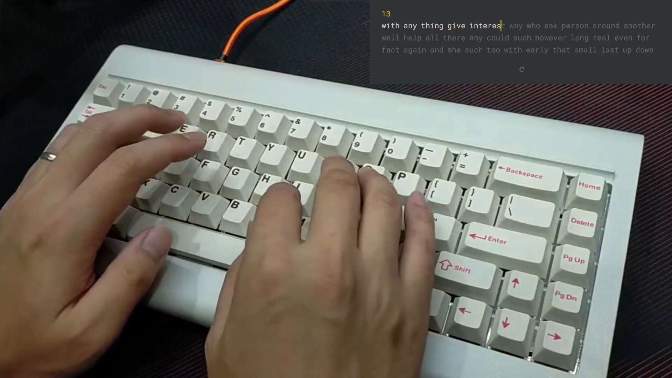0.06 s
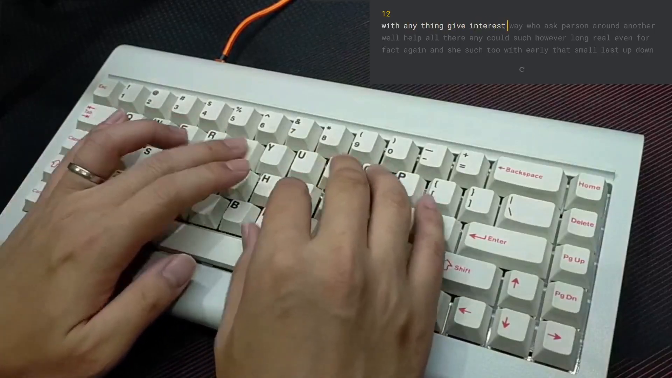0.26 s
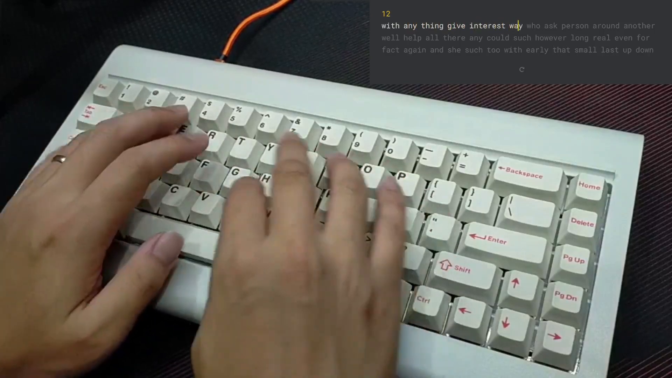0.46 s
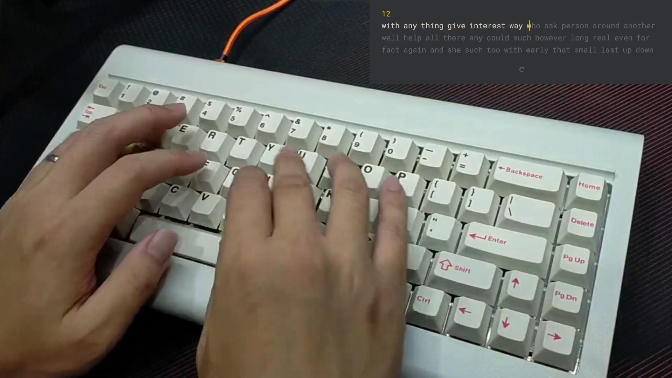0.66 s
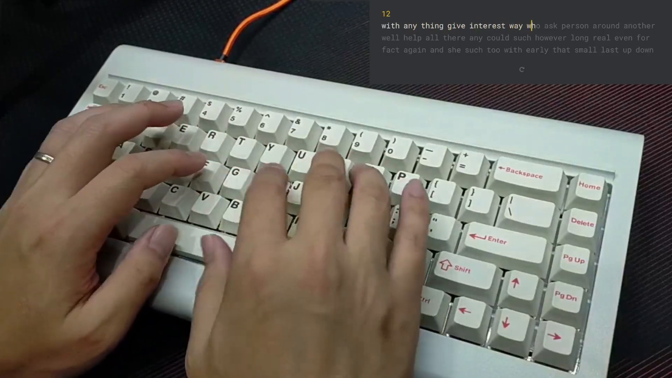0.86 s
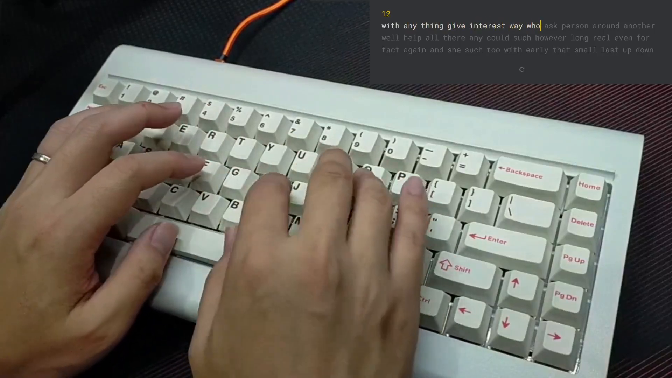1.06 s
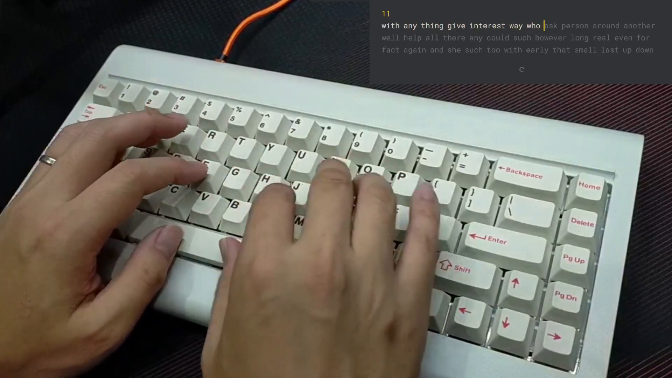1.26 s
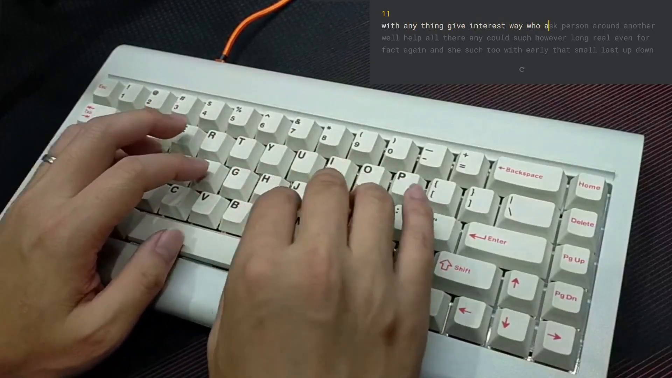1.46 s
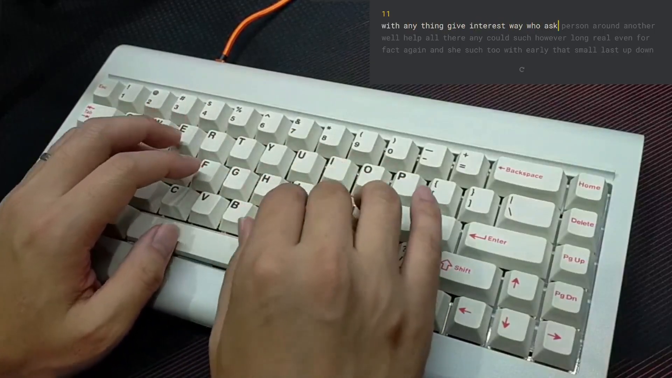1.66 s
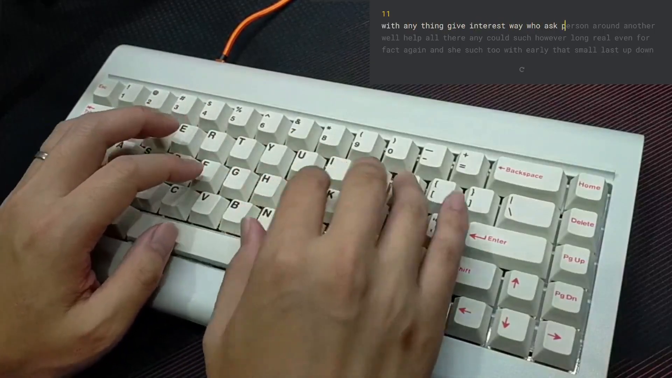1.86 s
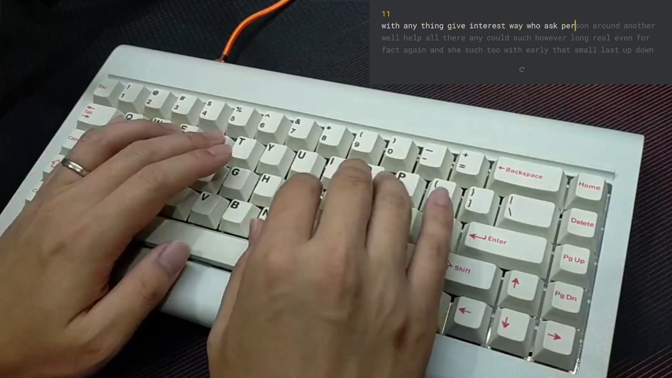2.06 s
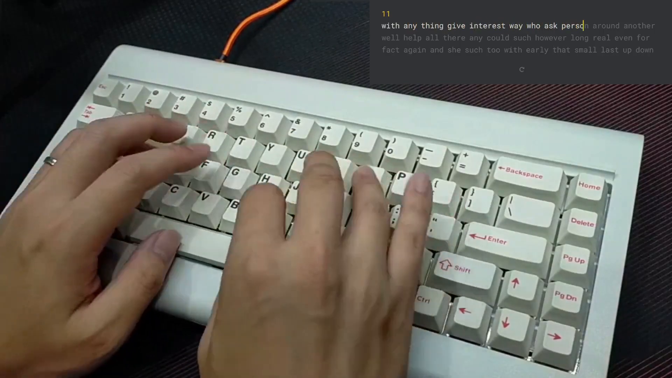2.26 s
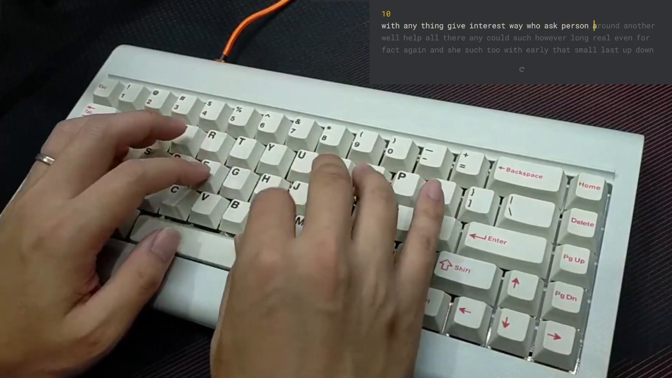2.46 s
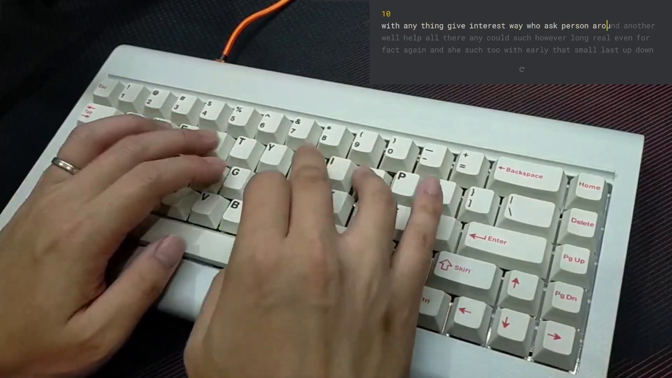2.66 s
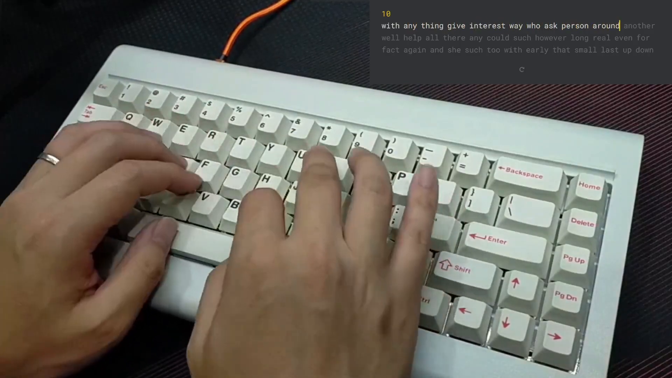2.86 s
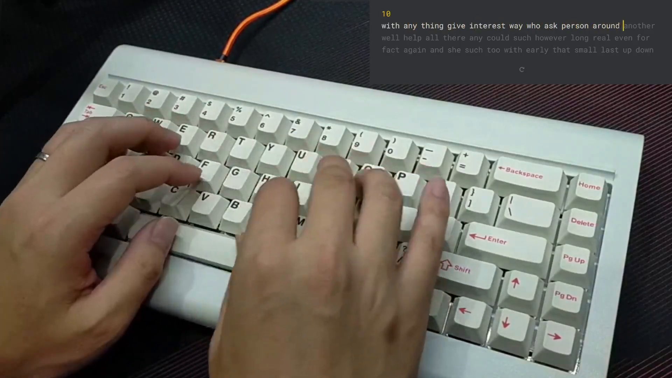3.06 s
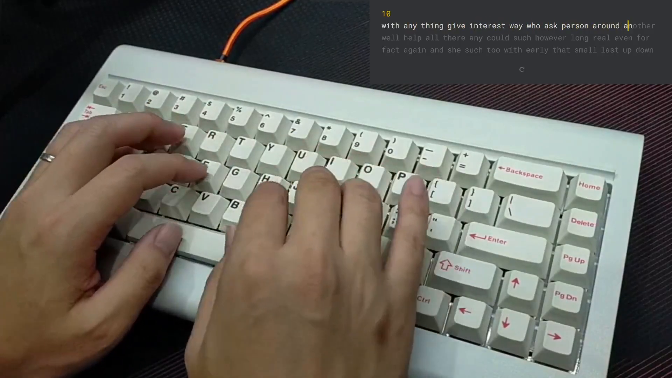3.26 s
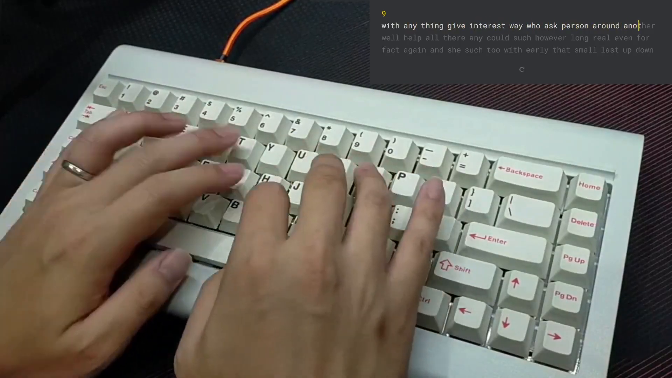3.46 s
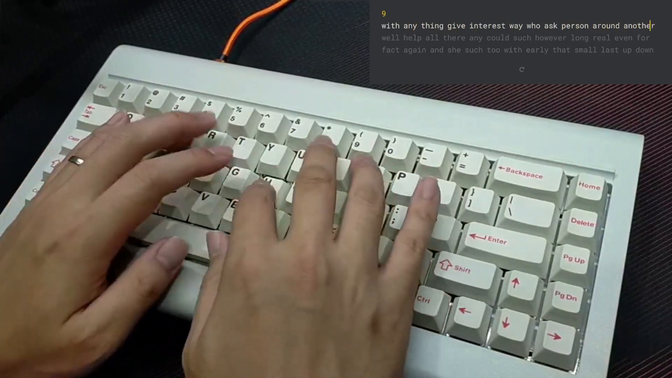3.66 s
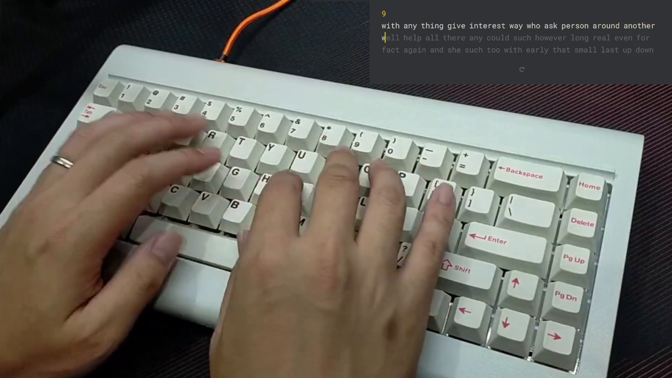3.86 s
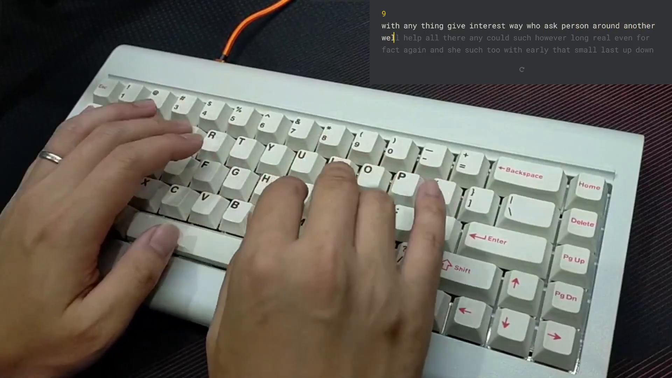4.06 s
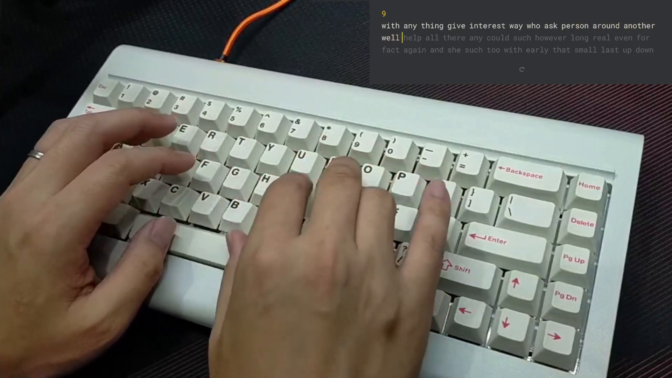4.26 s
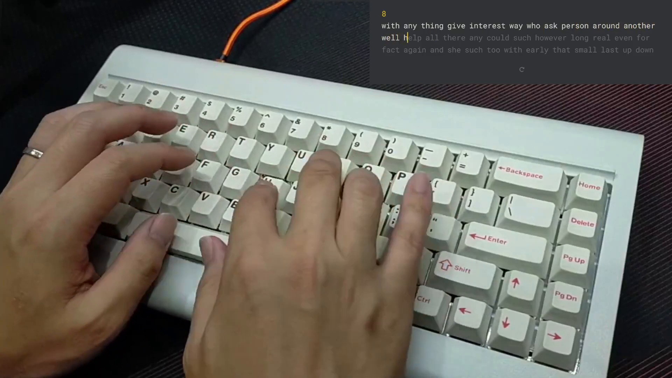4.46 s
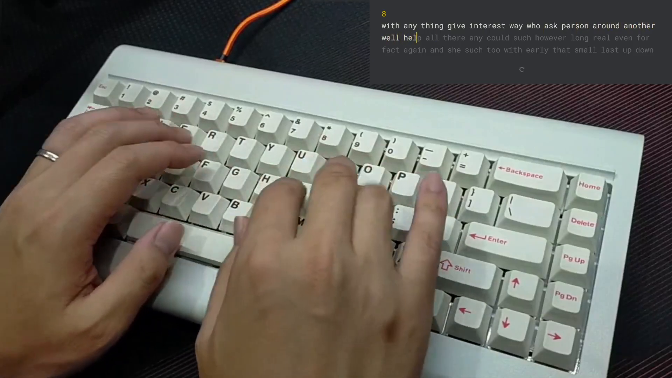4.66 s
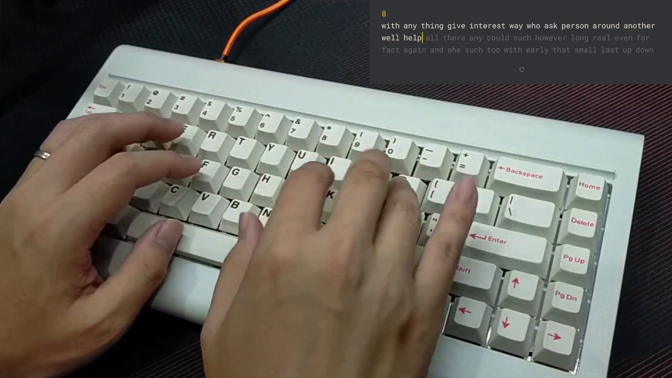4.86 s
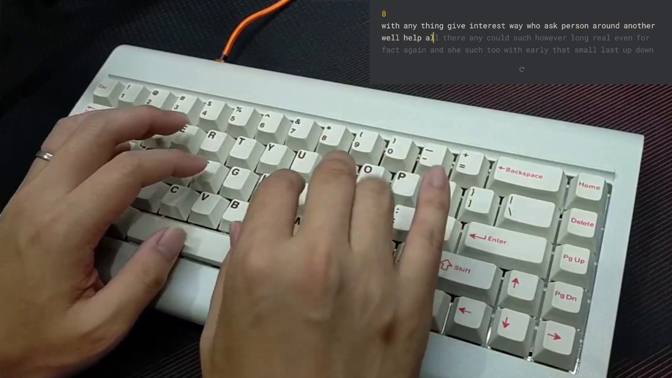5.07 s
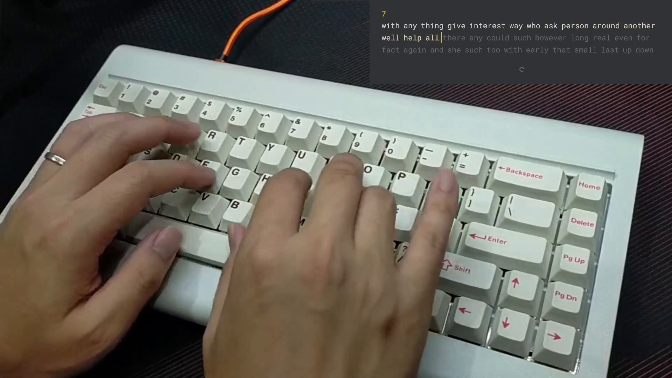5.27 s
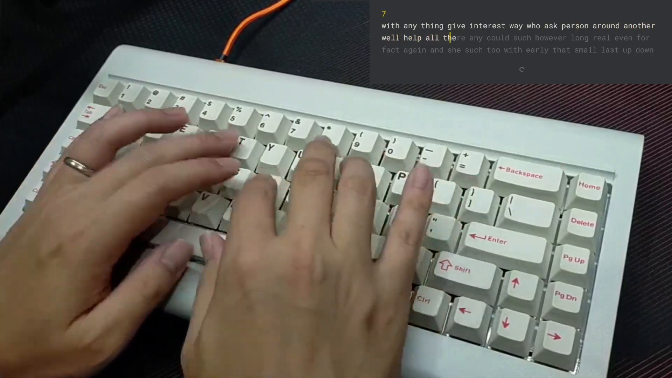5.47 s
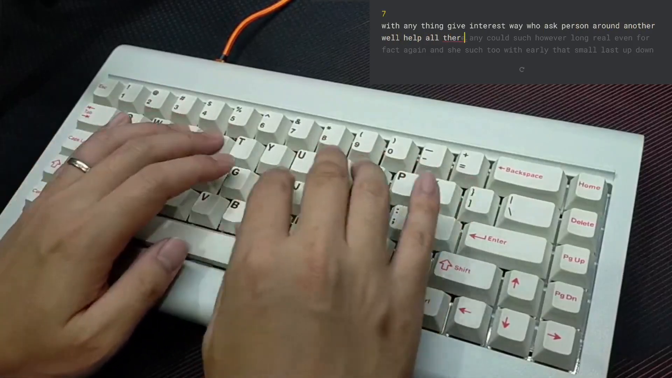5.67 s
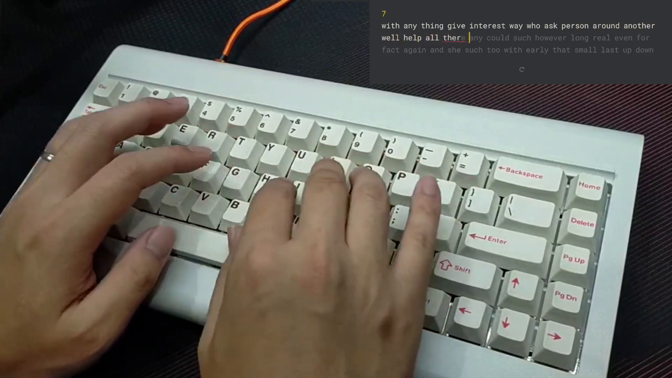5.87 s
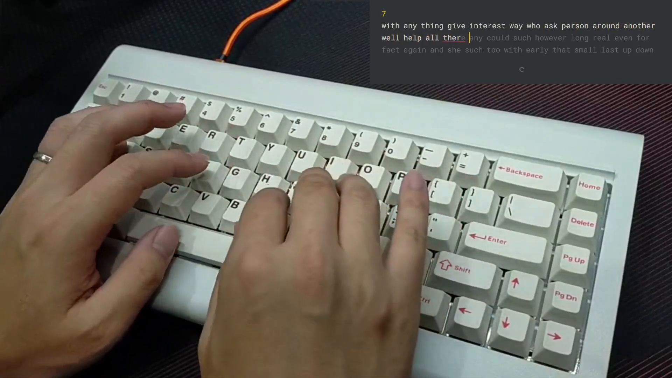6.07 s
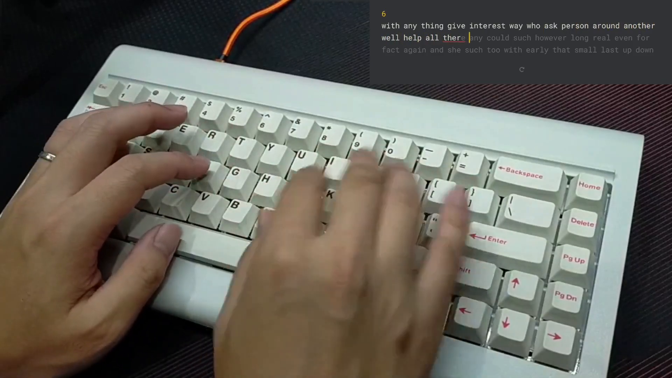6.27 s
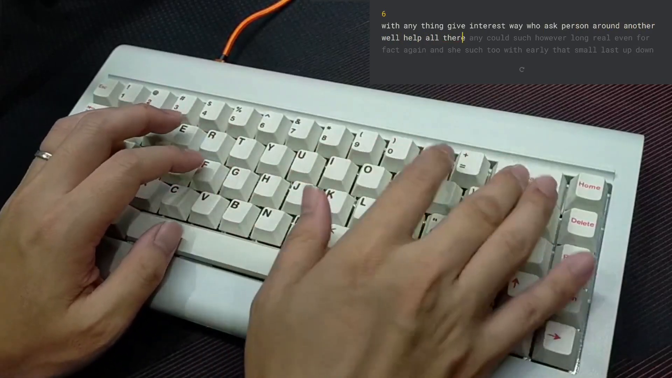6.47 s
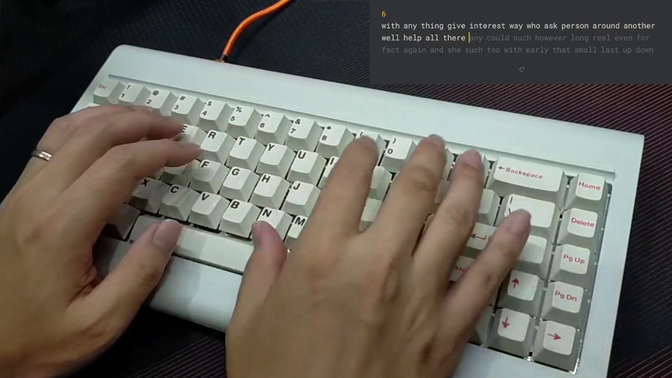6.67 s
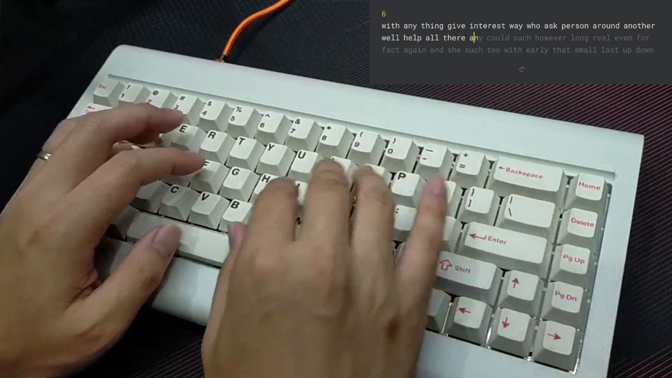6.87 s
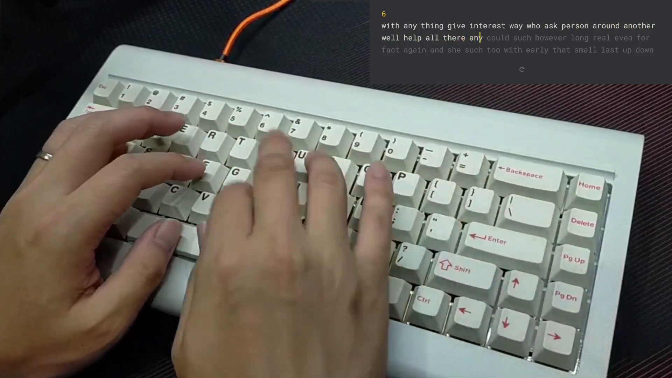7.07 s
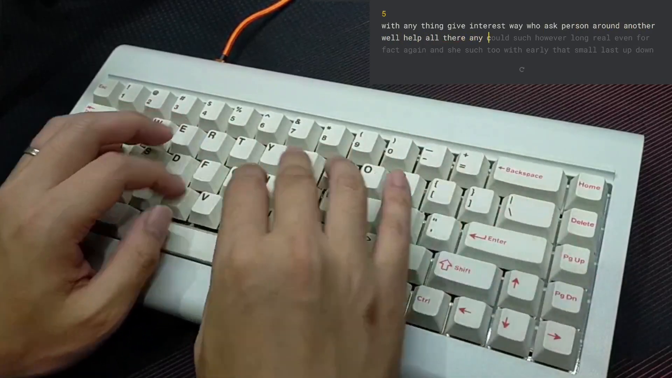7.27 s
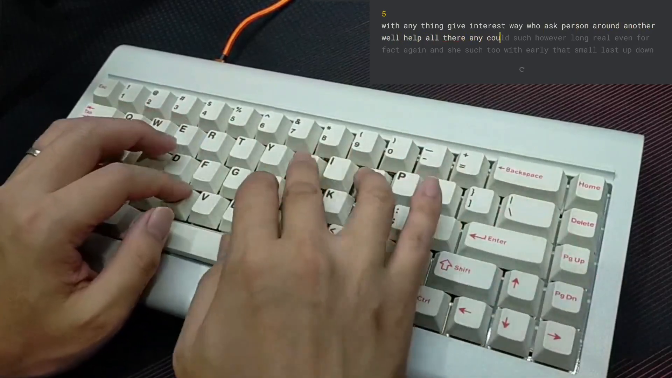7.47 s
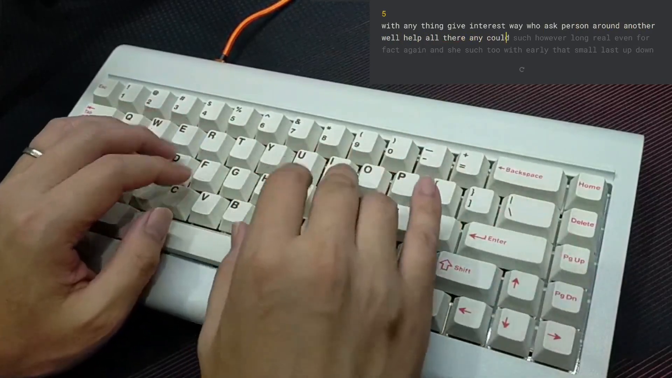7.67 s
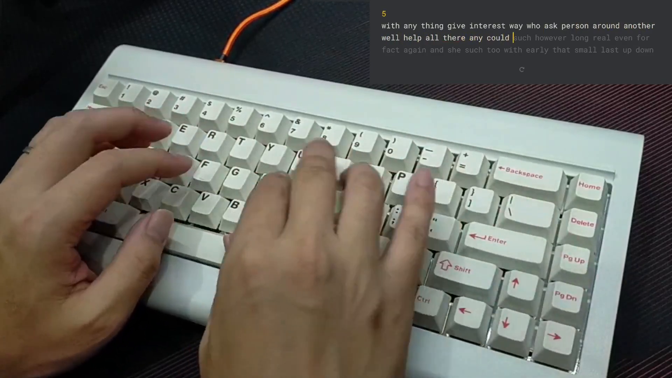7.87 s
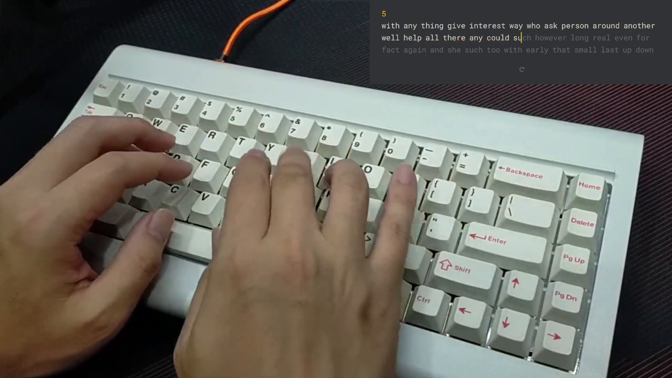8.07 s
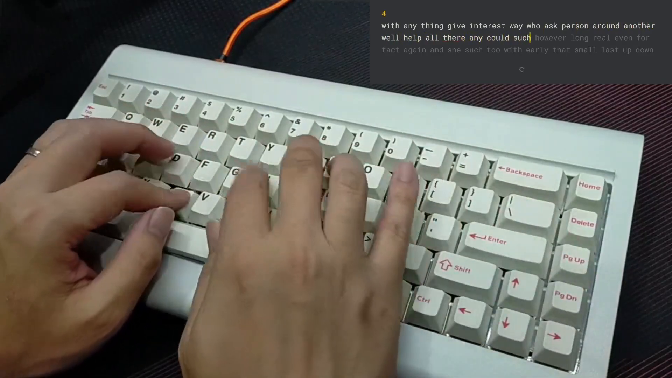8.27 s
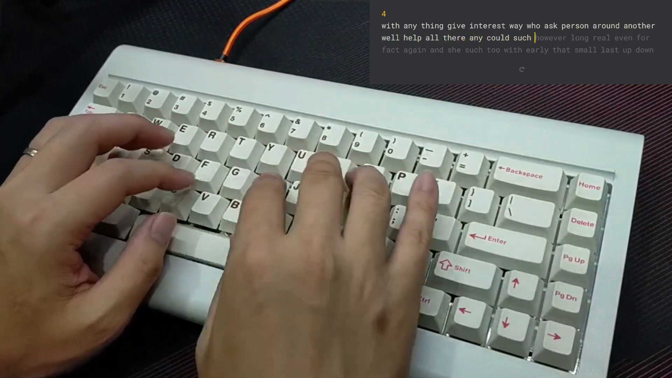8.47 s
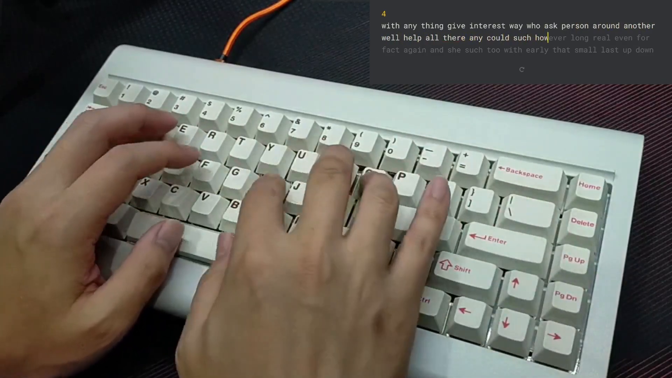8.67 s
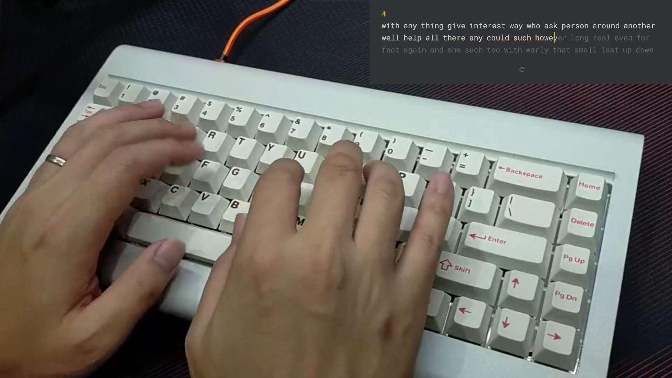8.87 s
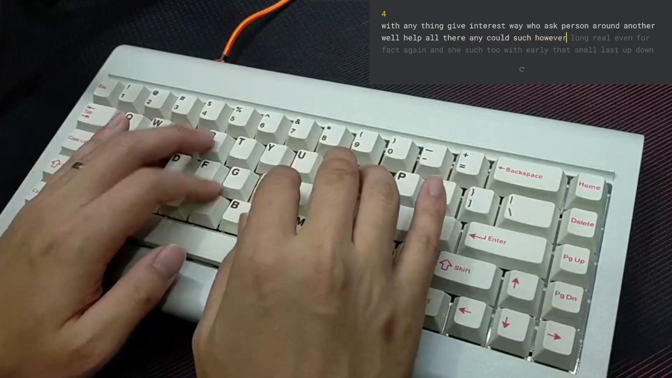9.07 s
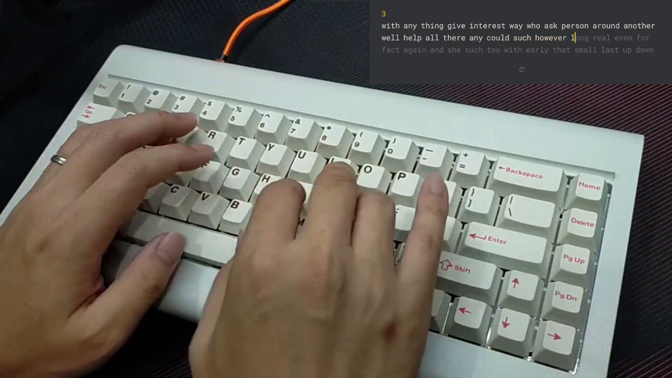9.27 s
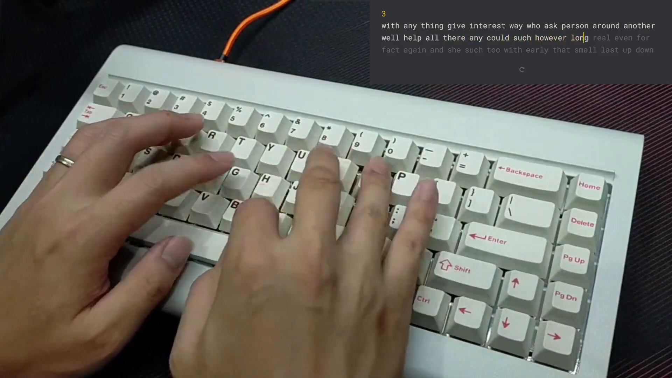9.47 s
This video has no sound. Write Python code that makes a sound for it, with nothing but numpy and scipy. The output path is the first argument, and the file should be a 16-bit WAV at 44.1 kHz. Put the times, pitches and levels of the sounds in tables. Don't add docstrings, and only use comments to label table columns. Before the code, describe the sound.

Fingers type fast on a mechanical keyboard resting on a soft mat. Short, hollow plastic clacks come in irregular bursts, with tiny returning-key clicks, faint stem rub and low desk thumps between. Long-bar presses sound deeper and rattle slightly. The flow stops briefly past the middle, restarts with a lower knock and a loud clack, and continues to the end. Short room tail, low steady hiss, close microphone.

```python
import sys
import numpy as np
from scipy import signal
from scipy.fft import rfft, irfft
from scipy.io import wavfile

SR = 44100
rng = np.random.default_rng(int(sys.argv[2]) if len(sys.argv) > 2 else 0)


def invert_db(level):
    return 10 ** (np.asarray(level, dtype=float) / 20)


def materialize(psi):
    bounded = np.clip(np.atleast_2d(psi).T, -1, 1)
    quanta = np.round(bounded * 32767).astype(np.int16)
    wavfile.write(sys.argv[1], SR, quanta)


N = 420273
MEAN_STRENGTH_DB = -31

# pitch_hz, level_db, t60_s [time to fall 60 dB]
CAP = [(1013.4, 12, 0.0051), (870, 10.5, 0.0012), (1155, -2, 0.0049), (1314, -9.5, 0.0032)]
# pitch_hz, width_hz, level_db
STEM = [(4360, 1300, 7.5), (5060, 430, 7.5)]
# pitch_hz, width_hz, level_db
TICK = [(7260, 3900, -33), (9330, 530, -2), (13600, 4600, -21)]


def rms_one(x):
    return x / np.sqrt(np.mean(x ** 2) + 1e-20)


def ring(x, hz, t60):
    r, w = invert_db(-60 / (t60 * SR)), 2 * np.pi * hz / SR
    return signal.lfilter([0, np.sin(w)], [1, -2 * r * np.cos(w), r * r], x + 1e-18)


def place(s, level_db, shape):
    energy = (shape ** 2).sum(axis=1, keepdims=True)
    shape = shape * 10 * invert_db(np.array(level_db))[:, None] / np.sqrt(energy)
    first = np.round(np.array(s) * SR).astype(int)[:, None] - 5
    out = np.zeros(N + shape.shape[1])
    np.add.at(out, first + np.arange(shape.shape[1]), shape)
    return out[:N]


def strikes(s, level_db, modes, tuning, rise_s, spread_db, detune, size, lean=0):
    hz, mode_db, t60 = np.transpose(modes)[:3]
    luck = rng.standard_normal((len(s), 2, len(hz)))
    t = np.arange(size) / SR
    pitch = (np.reshape(tuning, (-1, 1)) * hz * (1 + detune * luck[:, 0]))[:, :, None]
    gain = invert_db(mode_db + lean + spread_db * luck[:, 1])[:, :, None]
    rings = gain * invert_db(-60 * t / t60[:, None]) * np.sin(2 * np.pi * pitch * t)
    return place(s, level_db, rings.sum(axis=1) * (1 - np.exp(-t / rise_s)))


def cracks(s, level_db, colour, t60):
    t = np.arange(400) / SR
    rise_s = 0.00015
    spit = rng.standard_normal((len(s), len(t))) * invert_db(-60 * t / t60) * (1 - np.exp(-t / rise_s))
    spit = np.diff(spit, prepend=0, axis=1)
    coloured = sum(invert_db(db) * width * ring(spit, hz, 2.2 / width) / hz for hz, width, db in colour)
    return place(s, level_db, coloured)


def background():
    # pitch_hz, level_db [per Hz]
    hiss_curve = [(12, -36), (20, -6.5), (33, -10.5), (49, -36), (77, -19), (172, -18.5), (210, -49),
                  (499, -28.5), (678, -34.5), (1860, -31.5), (6360, -45), (16000, -45.5)]
    # pitch_hz, level_db
    fan_whine = [(1249, -86), (1561, -90), (1890, -80.5), (2137, -103), (8958, -95)]
    hz, level_db = np.transpose(hiss_curve)
    bins = np.maximum(np.arange(N // 2 + 1) * SR / N, 1)
    colour = invert_db(np.interp(np.log(bins), np.log(hz), level_db)) * (bins > 15) * (bins < 15800)
    hiss = invert_db(-64) * rms_one(irfft(rfft(rng.standard_normal(N)) * colour, N))
    return hiss + sum(invert_db(db) * rms_one(ring(rng.standard_normal(N), hz, 0.24)) for hz, db in fan_whine)


def desk():
    # pitch_hz, level_db, t60_s
    desk_modes = [(41.3, -14, 0.21), (55.8, -8.5, 0.3), (111.8, -8.5, 0.14), (134, -17, 0.077),
                  (215, -14, 0.049), (288.7, -12.5, 0.067)]
    # start_s, low_modes_db, upper_modes_db
    hand_thumps = [(0.194, -62, -66), (.439, -56, -48.5), (.67, -74, -70), (.755, -73, -67),
                   (1.093, -66, -54), (1.306, -64, -60), (1.83, -63, -62), (2.501, -64, -59),
                   (2.717, -59.5, -65), (2.916, -63, -52), (3.119, -67, -61), (3.95, -60.5, -57),
                   (4.239, -61, -74), (4.383, -61, -60), (4.701, -71, -64), (4.97, -58, -60),
                   (5.247, -57, -52), (5.44, -61, -56), (5.62, -65, -63), (6.803, -57, -47.5),
                   (7.083, -65, -67), (7.341, -63, -59), (7.55, -59, -61), (8.223, -61, -68),
                   (8.437, -56.5, -69), (8.561, -66, -59), (8.731, -59, -73), (9.287, -62, -66)]
    # start_s, rumble_db
    wrist_rumble = [(0.0, -65.5), (5.15, -64), (5.41, -62), (5.85, -63), (6.05, -72.5), (6.48, -70.5),
                    (6.6, -61), (7.09, -66.5), (7.96, -64), (9.53, -65.5)]
    s, *push_db = np.transpose(hand_thumps)
    push = np.tile(np.hanning(400), (len(s), 1))
    low, upper = (place(s + 0.0081, db - 24.0, push) for db in push_db)
    thump = np.zeros(N)
    for k, (hz, mode_db, t60) in enumerate(desk_modes):
        thump += invert_db(mode_db) * ring(low if k < 2 else upper, hz, t60)
    lumps = np.interp(np.arange(N), np.arange(0, N, 2000), rng.standard_normal(-(-N // 2000)))
    wrists = invert_db(2 * rms_one(lumps)) * rng.standard_normal(N)
    hum = sum(invert_db(mode_db) * ring(wrists, hz, t60) for hz, mode_db, t60 in desk_modes)
    rumble_db = np.interp(np.arange(N) / SR, *np.transpose(wrist_rumble))
    return thump + invert_db(rumble_db + 3.0) * rms_one(hum)


def key_contacts(s, cap_db, cap_hz, plate_db, stem_db, tick_db):
    # pitch_hz, level_db, t60_s, lean_db [per 100 Hz of cap pitch]
    plate_modes = [(565, -7.5, 0.075, 9), (686, 1, 0.016, 17.5), (823, 8.5, 0.013, 3),
                   (1103, 11, 0.011, 10.5), (1336, 6, 0.015, 7), (1540, 3.5, 0.017, 13.5),
                   (1750, -3.5, 0.02, -0.5)]
    lean_db = np.outer(np.clip((cap_hz - 2640) / 100, -1.5, 1.5), np.array(plate_modes)[:, 3])
    cap = strikes(s, cap_db, CAP, cap_hz / 1000, .0007, 2, .012, size=400)
    later_s = 0.0014 * rng.uniform(.6, 1.4, len(s))
    second_db = np.minimum(-13 - 0.9 * (cap_db - MEAN_STRENGTH_DB), -2)
    cap += strikes(s + later_s, cap_db + second_db, CAP, cap_hz / 1000, .0007, 3, .015, size=400)
    plate = strikes(s, plate_db, plate_modes, 1, .0004, 3.5, .03, size=1000, lean=lean_db)
    plate = signal.sosfilt(signal.butter(4, 490, "high", fs=SR, output="sos"), plate)
    return cap - plate + cracks(s, stem_db - 3.5, STEM, .0035) + cracks(s, tick_db, TICK, .0035)


def presses(rows, mean_tick_db):
    s, cap_db, cap_hz, stem_db = np.transpose(rows)
    harder_db = cap_db - MEAN_STRENGTH_DB
    snappier_db = stem_db + 44
    plate_db = -41 + 0.3 * harder_db + 0.077 * snappier_db
    return key_contacts(s, cap_db, cap_hz, plate_db, stem_db, mean_tick_db + 0.3 * harder_db)


def light_contacts(s, cap_db, cap_hz, plate_db, tick_db):
    return -key_contacts(s, cap_db, cap_hz, plate_db, (cap_db + tick_db) / 2 - 1.0, tick_db)


def earlier_stroke():
    # time_before_s, level_db
    unseen_stroke = (0.071, -12.5)
    before_s, level_db = unseen_stroke
    row = (.001, level_db, 2600, level_db - 11, level_db - 14, level_db - 24)
    stroke = key_contacts(*np.transpose([row]))
    return np.roll(room(stroke), -round(before_s * SR)) * (np.arange(N) < N // 2)


def padded_presses():
    # start_s, strength_db, cap_pitch_hz, stem_snap_db
    padded_rows = [(.039, -23.5, 2630, -32.5), (.354, -30.5, 2620, -41), (1.076, -32.5, 2620, -39.5),
                   (1.1113, -26.5, 2710, -37.5), (1.5779, -31.5, 2740, -36), (1.8125, -36, 2630, -47),
                   (2.1035, -40, 2500, -62), (2.1845, -36.5, 2470, -46), (2.3516, -30, 2820, -49),
                   (2.4324, -36, 2660, -50), (2.5177, -37, 2600, -43), (2.6573, -31, 2630, -39.5),
                   (2.7244, -26, 2590, -39.5), (2.8092, -33, 2770, -46), (3.0071, -32, 2750, -43),
                   (3.0933, -41, 2570, -60), (3.3569, -37, 2870, -41), (3.5421, -40, 2650, -63),
                   (3.6535, -28.5, 2660, -39), (3.7739, -37.5, 2560, -44), (4.1287, -30, 2530, -42.5),
                   (4.219, -37.5, 2520, -46), (4.389, -36, 2630, -41), (4.802, -38.5, 2600, -40.5),
                   (4.9787, -28.5, 2640, -37), (5.245, -29, 2630, -34), (5.3802, -37, 2630, -42.5),
                   (5.596, -38, 2380, -45), (5.637, -30.5, 2540, -39.5),
                   (6.976, -25.5, 2585, -33.5), (7.2715, -37.5, 2630, -56), (7.5563, -30, 2670, -37.5),
                     (7.621, -35, 2500, -58), (7.7853, -37, 2720, -43.5), (8.1473, -33.5, 2740, -79),
                     (8.3595, -37, 2720, -53), (8.4445, -30.5, 2550, -37), (8.7482, -37, 2630, -46.5),
                     (8.7802, -32.5, 2630, -49), (8.828, -52, 2520, -65), (8.928, -34.5, 2520, -42.5)]
    return presses(padded_rows, -66)


def plate_knocks():
    # start_s, peak_db, pitch_hz
    knocks = [(0.039, -31, 820), (0.197, -47, 715), (0.28, -35.5, 560), (0.354, -39, 1170),
              (0.426, -33, 1070), (0.553, -54, 1370), (0.614, -29.5, 1360), (0.665, -41, 780),
              (0.847, -40, 764), (0.924, -40, 1380), (1.074, -56, 1310), (1.11, -38, 560),
              (1.578, -38, 743), (1.722, -53, 1350), (2.039, -51, 555), (2.251, -47, 807),
              (2.35, -54, 1280), (2.658, -45, 743), (2.723, -41, 810), (3.007, -47, 1290),
              (3.355, -67, 740), (3.654, -34.5, 1150), (3.718, -33, 1080), (3.83, -37.5, 840),
              (4.072, -40, 1410), (4.129, -44, 750), (4.388, -40, 586), (4.693, -33, 830),
              (4.773, -48, 790), (4.801, -45, 1150), (4.978, -37.5, 660), (5.141, -41, 790),
              (5.244, -32, 649), (5.314, -41, 563), (5.38, -33, 605), (5.531, -39, 1140), (5.696, -35, 810),
              (6.642, -39, 756), (6.672, -31, 830), (6.757, -43, 807), (6.976, -34, 1340),
              (7.186, -34, 830), (7.555, -45, 552), (7.785, -33, 560), (7.875, -34.5, 554),
              (8.443, -48, 1310), (8.83, -52, 754), (9.141, -33, 830), (9.182, -27, 987), (9.243, -48, 797)]
    s, peak_db, hz = np.transpose(knocks)
    one_mode = [(0.99, 0, 0.029)]
    return -strikes(s, peak_db - 9, one_mode, hz, .0004, 0, 0, size=1000)


def ticks():
    # start_s, level_db, pitch_hz
    tick_rows = [(0.0393, -48.5, 8400), (0.13, -58, 9200.0), (0.1987, -43.5, 13400.0),
                 (0.2808, -54, 10100), (0.3533, -62, 9700.0), (0.425, -53.0, 9400), (0.5531, -42, 8460),
                 (0.6141, -59, 12400), (0.6659, -60, 6800.0), (0.8476, -50.5, 8600), (0.9263, -41, 8700),
                 (1.1124, -45, 6330), (1.5765, -59, 8300), (1.7225, -56, 9700), (2.039, -64, 9400.0),
                 (2.2507, -59, 9000.0), (2.3515, -54, 7460), (2.5176, -54.0, 10500.0),
                 (2.6572, -67, 7900.0), (2.7243, -52, 9200.0), (2.93, -51, 10500), (3.357, -52, 7140),
                 (3.6534, -54, 9450), (3.7193, -51, 9600), (3.8293, -53.0, 8800), (3.9485, -61, 9300),
                 (4.073, -60, 8400), (4.1406, -55, 9200), (4.2413, -57, 13400.0), (4.3887, -62, 12400.0),
                 (4.6932, -38.0, 8500), (4.7726, -58, 8200.0), (4.8018, -63, 8600.0),
                    (4.9778, -53, 9300.0), (5.1403, -48, 8500), (5.2432, -55, 9900.0),
                    (5.3141, -61, 8500.0), (5.379, -61, 10700.0), (5.5315, -60, 9500),
                    (5.6369, -63, 9700.0), (5.6961, -45, 9000.0), (6.672, -41, 8600), (6.9759, -43, 8000),
                    (7.0974, -62, 8550), (7.1868, -51.0, 9700), (7.4717, -58, 9800), (7.5563, -65, 6700.0),
                    (7.7843, -64, 9700.0), (7.8745, -58, 8800), (8.4445, -53, 10400.0), (8.831, -54, 8500),
                    (9.1409, -40, 7000), (9.1825, -38.5, 7000), (9.2226, -51, 9300.0),
                    (9.2435, -56, 8600.0)]
    s, tick_db, tick_hz = np.transpose(tick_rows)
    own = sum(cracks([at], [db], [(hz, 610, 0)], .003) for at, db, hz in zip(s, tick_db, tick_hz))
    return own + cracks(s, tick_db - 24, TICK, 0.003)


def keys_springing_back():
    # start_s, cap_db, plate_db
    return_rows = [(0.0782, -45.5, -41.5), (0.13, -46, -46), (0.6809, -42.5, -46.5), (.7432, -50, -46),
                   (.802, -50, -45.5), (1.1588, -47, -50), (1.2227, -56, -49.5), (1.324, -64, -41),
                   (1.66, -52.5, -50.5), (1.918, -61, -50.5), (2.2011, -46, -43.5), (2.572, -49.5, -44.5),
                   (2.6165, -47, -41.5), (2.8158, -38, -43), (2.903, -45, -44.5), (2.9656, -49, -48),
                   (3.0256, -39, -51), (3.4308, -43.5, -46.5), (3.579, -48, -47.5), (3.626, -47, -43.5),
                   (3.873, -46, -48.5), (3.91, -55, -45.5), (3.9427, -56, -48), (4.333, -56, -49),
                   (4.496, -53, -53), (4.8878, -45, -42),
                   (5.0808, -45, -44), (5.2193, -49, -47), (5.234, -47, -44), (5.4297, -54, -49),
                      (5.4738, -42.5, -38.5), (5.782, -52.5, -47.5), (5.8557, -48.5, -45.5),
                      (5.925, -56, -47), (6.6433, -73, -49), (6.662, -50, -57), (6.7566, -44, -51),
                      (6.8037, -51, -50), (7.056, -50, -47.5), (7.3734, -51.5, -43.5), (7.57, -53, -41.5),
                      (7.653, -49.5, -43), (7.7095, -46.5, -41.5), (8.077, -51, -60), (8.084, -54, -59),
                      (8.245, -69, -49), (8.316, -43, -41.5), (8.456, -52, -48), (8.9975, -48, -44),
                      (9.0883, -45, -45), (9.3, -48, -39), (9.382, -46, -43.5), (9.468, -42, -40)]
    s, cap_db, plate_db = np.transpose(return_rows)
    cap_hz = 2630 + 196 * rng.standard_normal(len(s))
    return light_contacts(s, cap_db, cap_hz, plate_db, cap_db - 20.5)


def rocking_caps():
    # start_s, cap_db, cap_pitch_hz
    landings = [(0.0805, -50, 2490), (0.2863, -50, 2720), (.6841, -55, 2570), (1.1166, -53, 2650),
                (1.7302, -55, 2760), (1.8175, -43.5, 2640), (2.0449, -53, 2640), (2.435, -44, 2510),
                (2.439, -54, 2830), (2.7284, -54, 2500), (3.9522, -52, 2650), (4.2506, -51, 2710),
                (4.395, -53, 2830), (4.774, -37, 2580), (4.8035, -36.5, 2750), (4.8892, -45, 2750),
                (4.9837, -45, 2620), (5.2498, -50, 2820), (5.2532, -42, 2720), (5.3158, -45, 2750),
                (5.5353, -61, 2560), (5.7006, -59, 2570), (7.56, -51, 2700), (7.6147, -56, 2540),
                (7.8858, -51, 2700), (8.2542, -45, 2780), (8.4504, -56, 2610), (8.785, -52, 2630),
                (8.8292, -39.5, 2520), (9.1477, -58, 2720), (9.19, -51, 2670), (9.2466, -51, 2510)]
    s, cap_db, cap_hz = np.transpose(landings)
    return light_contacts(s, cap_db, cap_hz, cap_db - 4, cap_db - 20.5)


def stem_rub():
    # pitch_hz, width_hz, level_db
    housing = [(9600, 2200, -7), (10500, 2200, -9), (13500, 3500, -7)]
    # start_s, length_s,
    # level_db
    slides = [(0.103, 0.042, -54), (0.243, 0.06, -52), (0.73, 0.14, -62), (1.06, 0.029, -62),
              (2.61, 0.022, -60), (2.694, 0.025, -62), (2.905, 0.097, -57), (4.654, 0.038, -69),
              (5.1, 0.031, -56), (6.94, 0.029, -59), (7.092, 0.031, -60), (7.163, 0.069, -60),
              (7.52, 0.066, -57), (7.67, 0.067, -57.5), (8.234, 0.031, -57), (8.288, 0.061, -57),
              (8.524, 0.055, -60), (8.798, 0.034, -61), (8.98, 0.034, -59), (9.05, 0.026, -56.5),
              (9.451, 0.085, -64)]
    sizes = invert_db(1.8 * np.minimum(rng.exponential(1, N), 4))
    grains = sizes * rng.standard_normal(N) * (rng.random(N) < 6000 / SR)
    out = sum(invert_db(peak_db) * rms_one(ring(grains, hz, 4.0 / width)) for hz, width, peak_db in housing)
    swell = np.zeros(N)
    for s, length, rub_db in slides:
        span = slice(round(s * SR), round((s + length) * SR))
        swell[span] += invert_db(rub_db - 8.0) * np.hanning(len(swell[span]))
    return swell * rms_one(out)


def grazing_fingers():
    # start_s, tick_db
    grazes = [(.1784, -62), (0.273, -59), (0.534, -58), (1.061, -56), (2.6178, -54), (2.9117, -35.5),
              (3.023, -53.5), (4.047, -61), (4.5776, -60.5), (4.68, -57), (5.237, -51), (6.949, -60),
              (7.079, -60), (7.426, -59), (7.8409, -55.5), (9.1268, -62), (9.301, -55), (9.468, -52.5)]
    s, tick_db = np.transpose(grazes)
    return light_contacts(s, tick_db - 6, 2750 + 0 * s, tick_db - 13.5, tick_db)


def sharp_presses():
    # start_s, strength_db, cap_pitch_hz, stem_snap_db
    sharp_rows = [(.1985, -27.5, 2770, -33.5), (.2816, -33, 2620, -49), (.4252, -37, 2440, -41.5),
                  (.5533, -21.5, 2520, -33.5), (.6141, -24.5, 2530, -35), (.666, -33, 2520, -54),
                  (.8478, -30, 2600, -44), (.9256, -31.5, 2560, -43.5), (1.724, -24, 2750, -36),
                  (2.04, -34, 2720, -44), (2.2514, -27, 2590, -45), (2.931, -36, 2610, -43),
                  (3.4901, -39.5, 2620, -52), (3.7181, -37, 2380, -40), (3.83, -28.5, 2590, -44),
                  (3.949, -40, 2470, -52), (4.0726, -28, 2570, -40), (4.1414, -34, 2550, -44),
                  (4.2432, -36, 2780, -41), (4.6932, -21, 2640, -30.5), (4.7728, -41, 2540, -45),
                  (5.1403, -29, 2720, -35), (5.3147, -37, 2750, -52), (5.5313, -27, 2630, -40),
                  (5.6963, -22, 2630, -35),
                  (6.6719, -19.5, 2630, -29), (7.098, -35.5, 2620, -43.5), (7.187, -38.5, 2630, -52),
                    (7.4721, -39, 2700, -52), (7.875, -40, 2600, -42.5), (8.252, -36.5, 2560, -67),
                    (8.8313, -30.5, 2630, -46), (8.9357, -37.5, 2520, -54), (9.141, -19, 2630, -28),
                    (9.1825, -27, 2600, -47), (9.2228, -31.5, 2560, -43), (9.2436, -30.5, 2630, -46)]
    return presses(sharp_rows, -54)


def long_bar():
    # start_s, bar_db, cap_db, tick_db
    bar_hits = [(0.4524, -32, -48, -52), (0.7631, -34, -65, -59), (1.313, -33, -48, -54),
                (1.8565, -38, -66, -66), (2.5977, -36, -54, -56), (3.144, -35, -51, -54),
                (3.9637, -35.5, -53, -65), (4.4291, -34.5, -50, -55), (5.0707, -39, -60, -66),
                (5.4457, -32, -53, -52.5), (5.875, -37.5, -55, -67), (6.8164, -29, -39.5, -48),
                (7.349, -33, -54, -54), (7.9318, -34, -36.5, -49), (8.5651, -36.5, -75, -72),
                (9.2964, -34, -61, -62)]
    # pitch_hz, level_db, t60_s
    bar_modes = [(192, -16, 0.04), (341, -16, 0.03), (410, -14, 0.035), (540, -2, 0.018), (650, -4, .014),
                 (806, -3, 0.016), (997, -0.5, 0.011), (1306, 2.5, .008), (1507, 6, 0.008),
                 (1955, 4, 0.006), (2260, -3, 0.004)]
    # delay_s, level_db
    bar_rattle = [(0, 1.5), (.0045, -26), (0.0146, -19)]
    s, bar_db, cap_db, tick_db = np.transpose(bar_hits)
    bar = cracks(s, tick_db, STEM + TICK, .006) + strikes(s, cap_db, CAP, 2.7, .0007, 2, .03, size=400)
    for delay, rattle_db in bar_rattle:
        bar -= strikes(s + delay, bar_db + rattle_db, bar_modes, 1, .00012, 3, .05, size=2500)
    return bar


def wide_key():
    # start_s, body_db, stem_db, tick_db
    wide_hits = [(6.5557, -31, -43.5, -52)]
    # pitch_hz, level_db, t60_s
    wide_modes = [(620, -17, 0.0052), (820, 0, 0.018), (1070, 11, 0.0082), (1570, -3.5, 0.008),
                  (2240, -2.5, 0.015)]
    s, body_db, stem_db, tick_db = np.transpose(wide_hits)
    body = strikes(s, body_db, wide_modes, 0.99, 0.00035, .1, .001, size=1500)
    wire = strikes(s + .011, body_db - 22, wide_modes, 1.1, .0004, 3, .05, size=1500)
    return body + wire + cracks(s, stem_db, STEM, 0.023) + cracks(s, tick_db, TICK, 0.011)


def room(x):
    # delay_s, level_db
    early_echoes = [
        (.0093, -30),
        (0.0118, -21),
        (0.024, -22),
    ]
    # pitch_hz, t60_s, energy_db
    tail_octaves = [(252, 0.25, -6), (484, 0.23, -7), (886, 0.23, -9), (2170, 0.24, -11.5),
                    (4780, 0.22, -11.5), (7740, 0.23, -13)]
    # pitch_hz, sharpness [no unit], share_lost [0 to 1]
    aimed_upward = [(580, 4, .3), (1050, 5, .25), (1450, 4, .25), (2620, 3, .42), (5250, 4, .35),
                    (8600, 2, .45)]
    t = np.arange(SR // 2) / SR
    density = np.minimum((1500 + 300000 * t) / SR, 1)
    echoes = rng.standard_normal(len(t)) * (rng.random(len(t)) < density) / np.sqrt(density)
    echoes *= 1 - np.exp(-t / .0045)
    tail = np.zeros(len(t))
    for delay, echo_db in early_echoes:
        tail[round(delay * SR)] = invert_db(echo_db)
    tail = signal.lfilter([.6], [1, -.4], tail)
    for hz, t60, energy_db in tail_octaves:
        limits = [hz / np.sqrt(2), min(hz * np.sqrt(2), .45 * SR)]
        octave = signal.butter(2, limits, "band", fs=SR, output="sos")
        band = signal.sosfilt(octave, echoes) * invert_db(-60 * t / t60)
        tail += invert_db(energy_db + 8.0) * rms_one(band) * np.sqrt(hz / SR / len(t))
    for hz, sharpness, lost in aimed_upward:
        x = x - lost * signal.lfilter(*signal.iirpeak(hz, sharpness, fs=SR), x)
    return signal.fftconvolve(x, tail)[:N]


def scene():
    light = keys_springing_back() + grazing_fingers() + rocking_caps()
    long_keys = long_bar() + wide_key()
    groups = [sharp_presses(), padded_presses(), light, long_keys, plate_knocks() + ticks()]
    keyboard = sum(x + room(x) for x in groups)
    return (keyboard + earlier_stroke() + desk() + stem_rub() + background())[None]


def band_limit(x):
    return signal.sosfilt(signal.butter(12, 16980, fs=SR, output="sos"), x)


def record(dry):
    top_cut = signal.cheby2(10, 60, 17000, fs=SR, output="sos")
    return band_limit(signal.sosfilt(top_cut, dry))


dry = scene()
out = record(dry)
materialize(out)
```